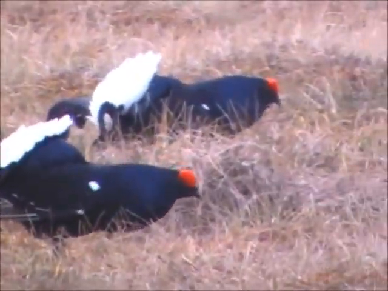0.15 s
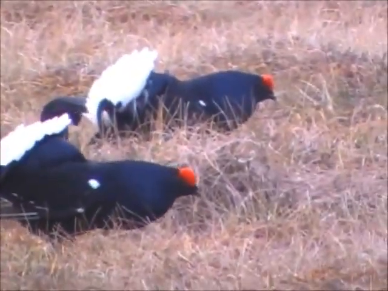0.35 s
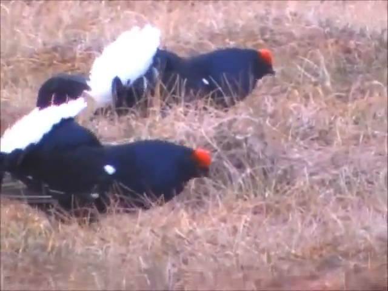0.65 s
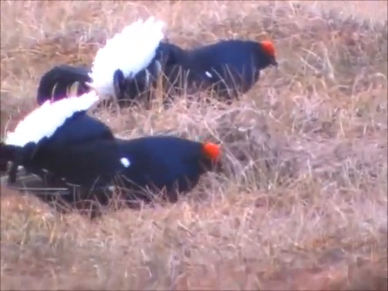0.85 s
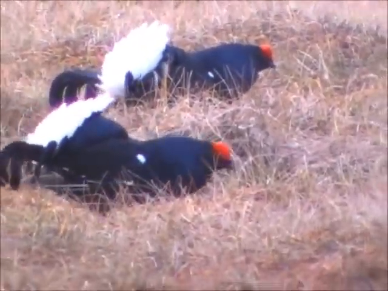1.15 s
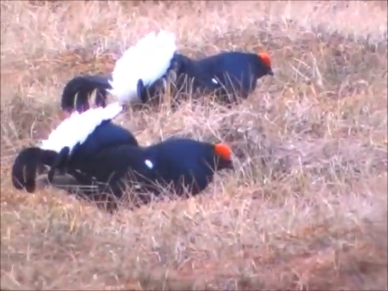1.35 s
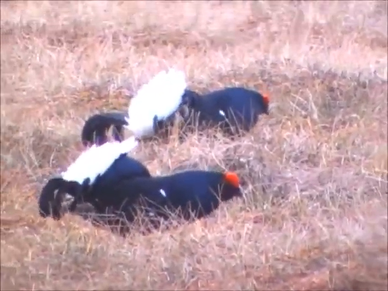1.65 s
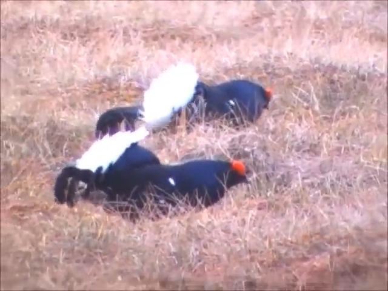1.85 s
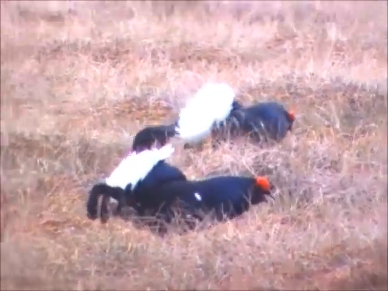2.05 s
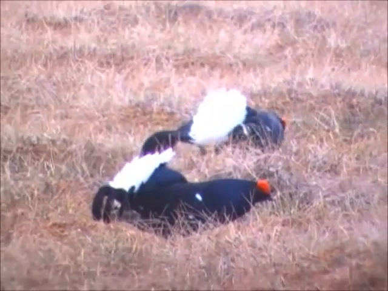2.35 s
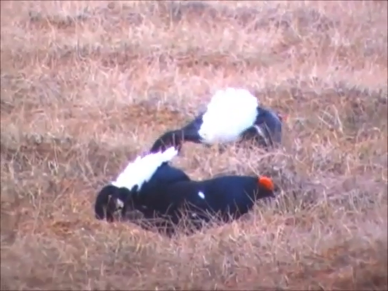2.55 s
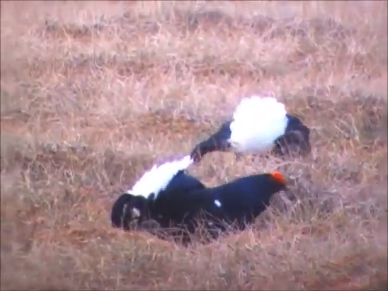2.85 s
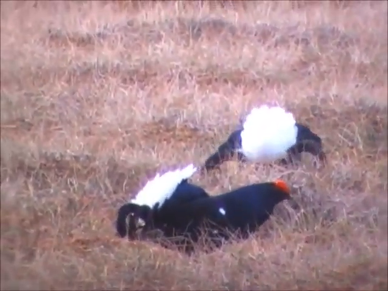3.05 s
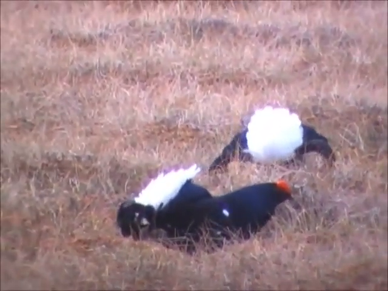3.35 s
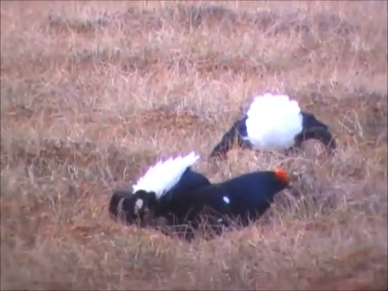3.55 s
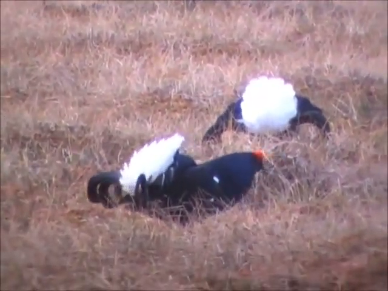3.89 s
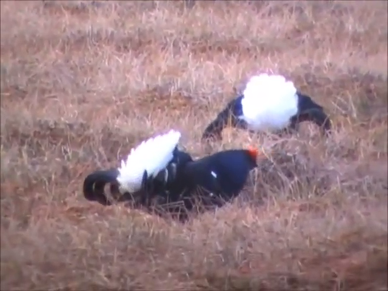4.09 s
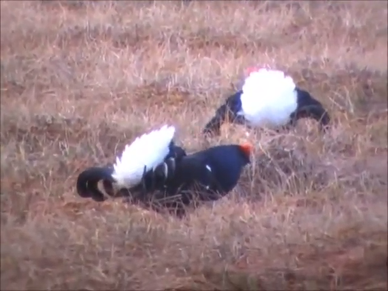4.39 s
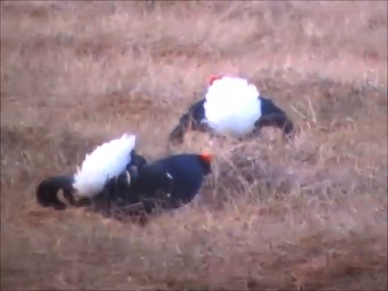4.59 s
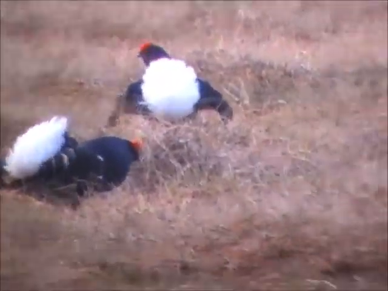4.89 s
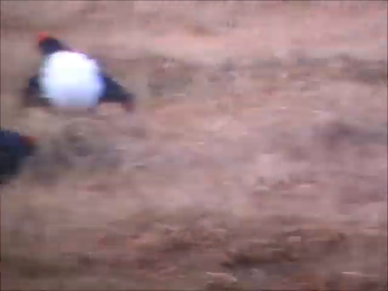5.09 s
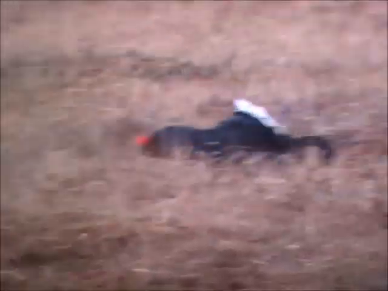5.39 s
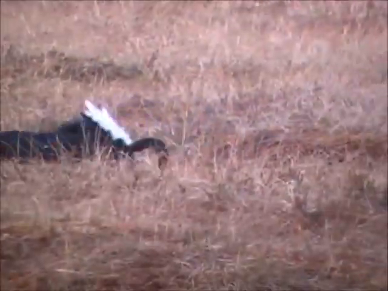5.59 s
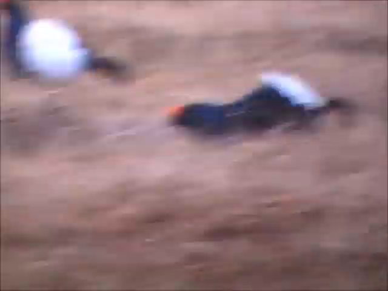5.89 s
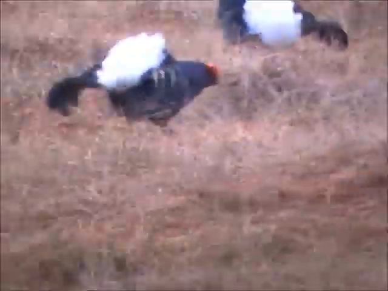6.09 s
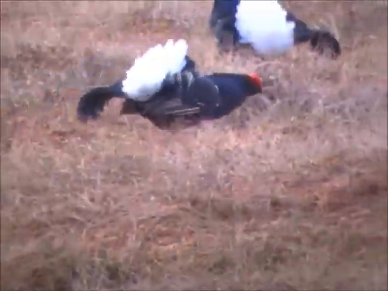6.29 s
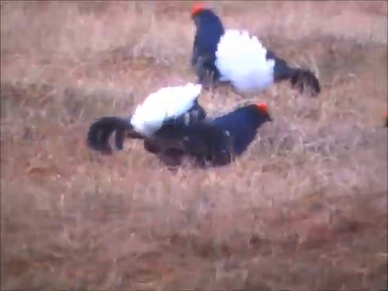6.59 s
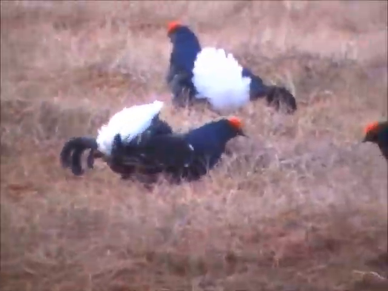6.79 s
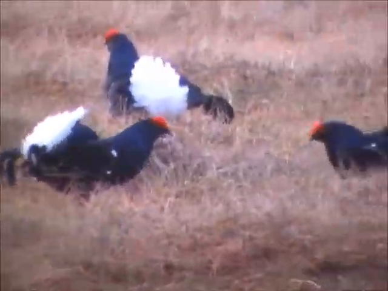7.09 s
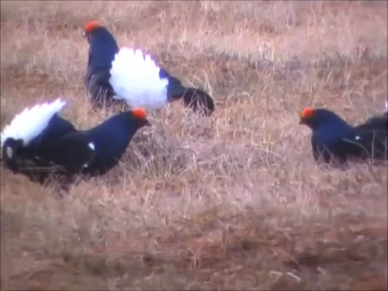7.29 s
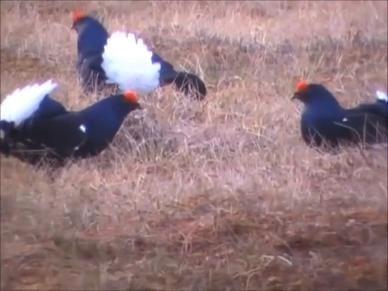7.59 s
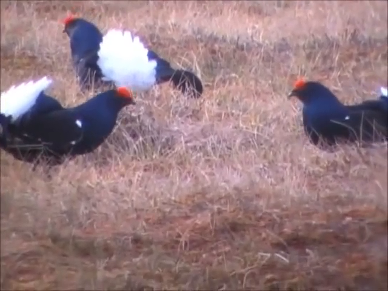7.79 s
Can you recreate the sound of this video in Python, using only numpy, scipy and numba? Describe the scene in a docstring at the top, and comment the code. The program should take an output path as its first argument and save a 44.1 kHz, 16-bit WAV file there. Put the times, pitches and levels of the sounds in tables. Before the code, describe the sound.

Several black grouse cocks bubble short low coos over a rolling distant chorus on an open bog. Softened hisses trail off at the start, then a pipit trills and buzzes. A long thin whistle and twitters follow, then one strong harsh hiss and a fast run of pipit phrases. Near the end come more buzzes, a piercing close call and a hard knock. The camera's microphone picks up its own faint whirr and ticks.

```python
"""Black grouse cocks display on an open bog, while a small camera whirrs, whines and ticks close by.
Far cocks blur into a chorus throughout, near ones bubble out short coos, and two of five hisses begin before the start.
A pipit trills and buzzes early; whistles and twitters follow, then the loudest hiss and a run of pipit phrases.
Late on come more buzzes, one loud call close by and a hard knock. Birds are gliding sine notes;
hisses are noise in moving resonances, ticks are ringing plastic, and air and wind are filtered noise."""
import sys
import numpy as np
from scipy import signal
from scipy.fft import next_fast_len
from scipy.io import wavfile
from numba import njit

SR = 44100
rng = np.random.default_rng(int(sys.argv[2]) if len(sys.argv) > 2 else 0)


def store_wav(level_fs):
    """Save 16-bit WAV to argv[1]."""
    pcm = np.round(np.clip(np.atleast_2d(level_fs), -1, 1) * 32767)
    wavfile.write(sys.argv[1], SR, pcm.T.astype(np.int16))


N = 350154


def amp(db):
    """Turn decibels into a plain gain."""
    return 10 ** (np.asarray(db, float) / 20)


def rms_one(x):
    """Scale a sound to an average power of 1."""
    return x / np.sqrt(np.mean(x ** 2) + 1e-20)


def pan(x, pan_db):
    """Make left and right copies, the left one pan_db louder."""
    return np.array([x * amp(pan_db / 2), x * amp(-pan_db / 2)])


def filtered(x, order, edges_hz, kind):
    """Keep one part of the spectrum: a smooth filter of the given kind."""
    return signal.sosfilt(signal.butter(order, edges_hz, kind, fs=SR, output="sos"), x)


def at_hz(points, hz):
    """Read a level from a spectrum table, with pitch on a logarithmic axis."""
    table_hz, values = np.array(points)[:, :2].T
    return np.interp(np.log(hz), np.log(table_hz), values)


def drift(rate):
    """Smooth random wandering around 0 with a spread of 1; a higher rate wanders faster."""
    step = 40   # samples between the random values
    r = np.exp(-2 * np.pi * step * rate / SR)
    noise = rng.standard_normal(N // step + 2002)
    slow = signal.lfilter([1], [1, -2 * r, r * r], noise)[2000:]   # skip the filter's start-up
    return np.interp(np.arange(N) / step, np.arange(len(slow)), rms_one(slow))


def span(rows):
    """Give the sample numbers from first to last row, and the other columns read along them."""
    s, *columns = np.transpose(rows)
    at = np.arange(max(round(s[0] * SR), 0), min(round(s[-1] * SR), N))
    return at, [np.interp(at / SR, s, column) for column in columns]


def add(out, rows, swing_hz=0., throb=1., edge_s=0.00033):
    """Add one gliding sine note with soft ends; rows hold seconds, Hz and peak dB."""
    at, (hz, db) = span(rows)
    k = np.arange(len(at))
    ends = np.clip(np.minimum(k, k[::-1]) / (edge_s * SR), 0, 1)
    cycles = np.cumsum(hz + np.resize(swing_hz, len(at))) / SR
    out[at] += amp(db) * throb * ends * np.sin(2 * np.pi * (cycles + rng.random()))


def flutter(rows, hz, swing_hz, from_share):
    """Swing the pitch of a note up and down, starting part way through it; the result is in Hz."""
    at = span(rows)[0]
    t = (at - at[0]) / SR
    depth = np.clip((t / t[-1] - from_share) * 6, 0, 1)
    return swing_hz * depth * np.sin(2 * np.pi * hz * t)


def ring(hits, hz, t60):
    """A unit hit sets off a sine that falls by 60 dB in t60 seconds."""
    r, w = amp(-60 / (t60 * SR)), 2 * np.pi * hz / SR
    return signal.lfilter([0, np.sin(w)], [1, -2 * r * np.cos(w), r * r], hits + 1e-18)


@njit
def resonate(x, two_cos, r):
    """A resonance whose centre can move sample by sample."""
    y = np.zeros(len(x))
    for i in range(2, len(x)):
        y[i] = x[i] - x[i - 2] + r * two_cos[i] * y[i - 1] - r * r * y[i - 2]
    return y


def sliding(hz, width_hz, count=1):
    """Noise passed count times through a resonance that follows hz, at an average power of 1."""
    x = rng.standard_normal(len(hz))
    two_cos, r = 2 * np.cos(2 * np.pi * hz / SR), np.exp(-np.pi * width_hz / SR)
    for _ in range(count):
        x = resonate(x, two_cos, r)
    return rms_one(x)


def stereo_noise(spectrum, patchy_db, more_alike):
    """Build noise from third-octave bands, each with its own level, flicker and left-right likeness."""
    # How alike left and right are; below 0 they push opposite ways, as in the bass.
    # Each row: pitch in Hz, likeness from -1 to 1 before more_alike is added.
    likeness = [(60, -0.53), (130, -0.42), (290, -0.42), (640, 0.025), (1410, 0.23), (3100, 0.78),
                (6820, 0.64), (15000, -0.82)]
    out, edges = 0, 40 * 2 ** (np.arange(0, 27) / 3)
    white = rng.standard_normal((2, 2, N))
    for k, (low, high) in enumerate(zip(edges, edges[1:])):
        mid, side = filtered(white[k % 2], 2, [low, high], "band")
        hz = np.sqrt(low * high)
        alike = np.clip(at_hz(likeness, hz) + more_alike, -.98, .98)
        gain = amp(at_hz(spectrum, hz) + patchy_db * drift(18.0))
        out = out + gain * (np.sqrt(1 + alike) * mid + np.sqrt(1 - alike) * side * [[1], [-1]])
    return rms_one(out)


def open_air():
    """Steady noise of open air and circuits, patchy from moment to moment."""
    # Colour of the noise. Each row: pitch in Hz, relative level in dB per Hz.
    air_spectrum = [(30, -6.5), (284, -5), (467, 4), (808, -4.5), (1080, -2), (1970, -2.5), (2300, -20.5),
                    (3070, -5.5), (5590, -10), (13300, -27), (15500, -58)]
    return amp(-55.5) * stereo_noise(air_spectrum, patchy_db=3.0, more_alike=-0.32)


def wind():
    """Gusts on the microphone: lumpy low noise that starts fast, fades and differs partly between left and right."""
    # Low rumbles. Each row: start in seconds, length in seconds, level in dB.
    gusts = [(2.362, 0.31, -63), (7.236, 0.13, -66.5)]
    t, level = np.arange(N) / SR, np.zeros(N)
    for s, length_s, db in gusts:
        level += amp(db) * np.interp(t, [s, s + 0.014, s + length_s], [0, 1, 0])
    mid, side = filtered(rng.standard_normal((2, N)), 2, [90, 280], "band")
    return level * amp(1.2 * drift(22.9)) * (rms_one(mid) + 0.69 * rms_one(side) * [[1], [-1]])


def camera():
    """The drive whirrs as noise in narrow bands, and a thin, high whine is a sine."""
    # Bands of the whirr. Each row: pitch in Hz, width in Hz, level in dB.
    whirr = [(1076, 9.7, -69.5), (1974, 110, -64), (3033, 230, -64)]
    whine_hz, whine_db = 15625, -93
    out = amp(whine_db + 3.2 * drift(3)) * np.sin(2 * np.pi * whine_hz * np.arange(N) / SR)
    for hz, width_hz, db in whirr:
        mid, side = [sliding(np.full(N, hz), width_hz) for _ in range(2)]
        out = out + amp(db) * (mid + 0.31 * side * [[1], [-1]])
    return out


def ticks():
    """Ticks ring the camera's plastic body, snap in the treble and thud in opposite directions left and right."""
    # Ticks of the body. Each row: time in seconds, level in dB,
    # thud in dB relative to the tick before a common boost.
    tick_rows = [(0.341, -48.5, -16), (0.502, -48.5, -27), (0.623, -52, -16), (0.752, -45, -31),
                 (1.087, -57, -28), (1.256, -52.5, -22), (1.407, -53.5, -18), (2.015, -44, -15),
                 (2.986, -51.5, -20), (4.542, -51.5, -9), (4.597, -50, -44), (6.004, -54, -17),
                 (6.663, -46.5, -15), (7.557, -50, -20), (7.579, -50, -20), (7.633, -54, -20),
                 (7.75, -57, -20), (7.805, -56, -25), (7.839, -52, -17), (7.928, -38, -28)]
    # One harder knock: time in seconds, level in dB, thud in dB as above.
    knock = (7.921, -30.5, -30)
    # Resonances of the plastic. Each row: pitch in Hz, gain in dB, time to fall 60 dB in seconds.
    plastic = [(757, 8.5, 0.02), (1010, 1, 0.021), (1390, 8, 0.0059)]
    knock_lead_s, snap_t60_s = .0003, 0.0089
    s, db, thud_db = np.transpose(list(tick_rows) + [knock])
    at = np.round(s * SR).astype(int)
    body, thud, snap = np.zeros((2, N)), np.zeros(N), np.zeros((2, N))
    body[:, at] = pan(amp(db), -8)
    thud[at] = amp(db + thud_db + 17.0)
    snap[:, at] = amp(db + 4)
    # the ringing of the knock is equal on both sides but reaches the left first
    body[:, at[-1]] = 0, amp(db[-1])
    body[0, at[-1] - round(knock_lead_s * SR)] = amp(db[-1])

    soft = signal.lfilter([.25], [1, -.75], body)
    rung = sum(amp(level_db) * ring(soft, hz, t60) for hz, level_db, t60 in plastic)
    rung = filtered(rung, 2, 350, "high")
    decay = signal.lfilter([1], [1, -amp(-60 / (snap_t60_s * SR))], snap + 1e-18)
    crack = filtered(rng.standard_normal(N), 3, [1500, 7700], "band")
    push = ring(signal.lfilter([.05], [1, -.95], thud), hz=184, t60=0.033)
    return rung + decay * crack + push * [[1.3], [-.5]]


def clicks():
    """Dry clicks: short dying bursts of noise, each in a band around its own pitch."""
    # Each row: time in seconds, peak level in dB, pitch in Hz.
    click_rows = [(.752, -33, 4500), (1.085, -43, 1550), (2.308, -42, 1600), (2.388, -46, 1750),
                  (6.37, -53, 12500), (6.561, -28, 5300)]
    width, cycles = .24, 70   # band half-width as a share of the pitch; cycles to fall 60 dB
    out, t = np.zeros(N), np.arange(SR // 20) / SR
    for s, db, hz in click_rows:
        noise = rng.standard_normal(len(t)) * amp(-60 * t * hz / cycles)
        burst = filtered(noise, 2, [hz * (1 - width), hz * (1 + width)], "band")
        out[round(s * SR):][:len(t)] += amp(db) * burst / np.abs(burst).max()
    return out


def outdoors(x):
    """Return sound from ground, hummocks, scrub and trees: faint echoes and a diffuse tail, unlike left and right."""
    # Ground and hummocks. Each row: middle delay in seconds (left a little less, right more), level in dB.
    echoes = [(0.01, -13.5), (0.028, -28.5)]
    trees_t60_s, trees_db = 0.71, -12.5
    t = np.arange(SR // 2) / SR
    tail = rng.standard_normal((2, len(t))) * amp(-60 * t / trees_t60_s) * (t > .01)
    tail *= amp(trees_db) / np.sqrt(np.sum(tail[0] ** 2))
    for lag_s, db in echoes:
        tail[[0, 1], [round(lag_s * .93 * SR), round(lag_s * 1.08 * SR)]] += amp(db)
    return signal.fftconvolve(x[None], tail, axes=1)[:, :N]


def far_chorus():
    """Two far cocks keep up a rolling beat of coos; the lower is more even and falls, the higher also rises."""
    # Each row: time in seconds, level of the lower cock in dB, level of the higher cock in dB, before mixing.
    chorus_levels = [(0, -63, -57.5), (.72, -60, -62), (0.802, -81, -72), (.95, -64.5, -65.5),
                     (1.9, -61, -58), (2.151, -80, -59), (2.25, -67, -67.5), (3.55, -73, -62),
                     (3.65, -65.5, -72), (4.3, -60.5, -68.5), (4.6, -61.5, -61), (5.9, -63, -57),
                     (6.5, -70, -59.5), (6.7, -72, -67.5), (7.94, -88, -87)]
    # Pitch of the lower cock. Each row: time in seconds, pitch in Hz.
    low_pitch = [(0, 422), (1, 397), (3.6, 398), (4.25, 400), (4.8, 448), (7.94, 430.6)]
    # Range of the pitch slides of the lower and the higher cock, in Hz from the middle to the end of a coo.
    slide_ranges = (14, 64), (-45, 70)
    coos_per_s, high_pitch = 13, [(0, 508)]
    s, *levels_db = np.transpose(chorus_levels)
    cocks = []
    for level_db, uneven, slides_hz, pitches in zip(levels_db, (.25, .9), slide_ranges, (low_pitch, high_pitch)):
        gap, size, length, pitch, fall = rng.random((130, 5)).T
        at = np.cumsum(1 + uneven * (gap - .5)) / coos_per_s
        hz = np.interp(at, *np.transpose(pitches)) + 60 * uneven * (pitch - .5)
        rows = np.c_[at, 7 * size, 24 + 20 * length, hz, np.interp(fall, (0, 1), slides_hz)]
        coos = rms_one(coo_train(rows[at < N / SR], 0.79))
        cocks.append(amp(np.interp(np.arange(N) / SR, s, level_db)) * coos)
    lower, higher = cocks
    return np.array([lower + 1.52 * higher, higher + 0.68 * lower])


def pipit_trills(out):
    """A pipit repeats quick falling strokes that slowly spread apart."""
    # Each row: start in seconds, number of strokes, first gap in seconds (it grows), level in dB.
    trills = [(0.1491, 14, .0843, -55.5), (5.7503, 2, .0803, -54.5)]
    # One falling stroke. Each row: time in seconds, pitch in Hz, relative level in dB.
    stroke = [(0, 5870, -27), (.006, 5620, 8), (.014, 4840, 3), (.021, 4150, -6), (.03, 3450, 2.5),
              (0.041, 2850, -19)]
    swell_db = .25   # rise per stroke through the first half
    slowing_s = .00007   # extra delay, times the stroke number squared
    for s, count, gap_s, db in trills:
        for k in range(round(count)):
            start = s - .003 + k * gap_s + k * k * slowing_s
            level_db = db + swell_db * min(k - count / 2, 0) + rng.normal(0, 1)
            add(out, np.array(stroke) * [1, rng.normal(1, 0.0093), 1] + [start, 0, level_db])


def pipit_phrases(out):
    """A pipit repeats one phrase of quick gliding notes, each time slightly varied."""
    # Each row: start in seconds, level in dB.
    phrases = [(4.492, -51.5), (4.661, -47.5), (4.816, -45), (4.97, -41.5), (5.125, -43), (5.279, -40),
               (5.436, -41), (5.591, -43)]
    # Three rising strokes, a peaked note and a low flick.
    # Each row of a note: time in seconds, pitch in Hz, relative level in dB.
    phrase_notes = [
        [(0, 5220, -8), (.006, 5850, -15), (.011, 6370, -8)],
        [(.007, 5080, -15), (.016, 6010, -2), (.025, 6600, -10)],
        [(.021, 5200, -7), (.031, 6050, -1), (.045, 6750, -6)],
        [(.046, 3600, -31), (.058, 4285, -5.5), (.064, 5800, -5), (.072, 4720, -2), (.084, 3270, -16)],
        [(.09, 3420, -2), (.098, 3150, -8), (.112, 2600, -16)],
    ]
    for s, db in phrases:
        for note in phrase_notes:
            varied = np.array(note) * [1, rng.normal(1, 0.0089), 1]
            add(out, varied + [s, 0, db + rng.normal(0, 1.06)], edge_s=0.0004)


def pipit_buzzes(out):
    """A pipit buzzes: an upward flick, then a falling note that flutters fast in level and pitch."""
    # Each row: start in seconds, length in seconds, pitch factor, level in dB.
    buzzes = [(1.376, 0.187, 1.001, -50.5), (1.81, 0.265, .995, -48), (5.95, 0.21, 1.02, -47),
              (6.416, 0.22, 1.02, -44.5), (6.923, 0.24, 1.012, -46.5)]
    # Course of a buzz. Each row: share of its length, pitch in Hz before the factor, relative level in dB.
    buzz_course = [(0, 6520, -11), (.08, 6370, -3), (0.198, 6340, 0.5), (0.398, 6090, 0.5), (.6, 5630, 0),
                   (.8, 5410, 1), (.92, 5370, 0), (1, 5350, -8.5)]
    # Flick into the buzz. Each row: time in seconds, pitch in Hz, relative level in dB.
    lead_flick = [(-.013, 4050, -13.5), (-.006, 5280, -3), (.001, 6800, -3)]
    flutter_hz, level_depth, swing_hz = 147, 0.37, 208   # the rate wanders around flutter_hz
    for s, length_s, pitch, db in buzzes:
        rows = np.array(buzz_course) * [length_s, pitch, 1] + [s, 0, db]
        at = span(rows)[0]
        cycles = np.cumsum(flutter_hz * amp(1.9 * drift(56)[at])) / SR
        beat = 2 * np.pi * (cycles + rng.random())
        swing = swing_hz * np.linspace(1, .6, len(at)) * np.sin(beat)
        add(out, rows, swing, 1 + level_depth * np.sin(beat + 2.0))
        add(out, np.array(lead_flick) + [s, 0, db])


def long_whistles(out):
    """A long whistle drops quickly in pitch, then sags slowly as it swells."""
    # Each row: start in seconds, length in seconds, level in dB.
    whistles = [(2.45, .645, -43), (7.565, .6, -41)]
    # Swell of a whistle. Each row: share of its length, relative level in dB.
    whistle_swell = [(0, -23), (.14, -15), (.4, -9.5), (.7, 1.5), (.96, -9), (1, -9)]
    base_hz, drop_hz, settle_s, sag_hz_per_s = 6920, 1053, .1, 1100
    for s, length_s, db in whistles:
        t = np.linspace(0, length_s, 60)
        hz = base_hz + drop_hz * np.clip(1 - t / settle_s, 0, 1) ** 1.4 - sag_hz_per_s * t
        level_db = db + np.interp(t / length_s, *np.transpose(whistle_swell))
        add(out, np.c_[s + t, hz, level_db], edge_s=0.00067)


def twitters(out):
    """Each twitter is three upward flicks of growing strength, a warble and a slide down."""
    # Each row: start in seconds, level in dB.
    twitter_rows = [(2.571, -52), (2.853, -50), (3.125, -51.5), (3.399, -49)]
    # The three parts. Each row: time in seconds, pitch in Hz, relative level in dB.
    flick = [(0, 3380, -8), (.007, 4170, -1.5), (.013, 4700, -0.5), (.018, 3870, -14)]
    warble = [(.064, 5500, -5), (.075, 5650, -5), (.122, 5650, -6)]
    slide = [(.122, 5220, -14), (.132, 4750, -4), (.15, 4280, -4)]
    flick_gap_s = 0.023
    for s, db in twitter_rows:
        for k in range(3):
            add(out, np.array(flick) + [s + k * flick_gap_s, 0, db + 2.5 * (k - 2)])
        rows = np.array(warble) + [s, 0, db]
        uneven = amp(3.7 * drift(40)[span(rows)[0]] - 2)
        add(out, rows, flutter(rows, hz=55, swing_hz=290, from_share=0), uneven)
        add(out, np.array(slide) + [s, 0, db])


def short_notes(out):
    """Other small birds give arched notes, rising notes that end in a flutter, and brief chirps."""
    # Arched and rising notes. Each row: start in seconds, level in dB.
    arches = [(1.631, -55.5), (6.231, -52.5), (6.73, -54)]
    risers = [(6.711, -55), (6.927, -56.5), (7.146, -57)]
    # Shapes of one arch and one rise. Each row: time in seconds, pitch in Hz, relative level in dB.
    arch = [(0, 3110, -0.5), (.04, 3560, 3), (.056, 3600, 5), (.085, 3080, -2)]
    riser = [(0, 2975, 1), (.03, 3330, 1.5), (.062, 4250, 3.5), (.135, 4550, -3)]
    # Each row: start in seconds, length in ms, start, middle and end pitch in Hz, level in dB.
    chirps = [(1.78, 8, 4300, 5050, 5500, -54), (2.75, 40, 1380, 1440, 1510, -48),
              (2.795, 28, 1740, 1830, 1900, -51), (2.256, 43, 6200, 5300, 4730, -57),
              (2.352, 34, 4100, 3500, 3100, -56), (2.463, 37, 6530, 5400, 4750, -51),
              (2.51, 38, 1630, 1695, 1730, -55), (2.553, 20, 2500, 2450, 2400, -55),
              (2.825, 22, 2720, 2720, 2690, -56), (3, 18, 3880, 3400, 3030, -55),
              (3.104, 20, 2670, 2570, 2500, -50), (3.15, 19, 3910, 3500, 3100, -53),
              (3.307, 20, 3900, 3450, 3020, -54), (3.458, 20, 3900, 3500, 3100, -57),
              (4.49, 117, 3580, 3770, 3770, -55), (4.52, 105, 2500, 2620, 2580, -55.5),
              (4.627, 20, 4630, 4000, 3500, -52.5), (4.648, 39, 3120, 3050, 2710, -47),
              (4.7, 43.4, 2320, 2130, 1970, -47.5), (5.042, 11, 3100, 3500, 3000, -49),
              (5.078, 13, 3900, 3300, 3120, -46.5), (5.09, 19, 3060, 3800, 3140, -48),
              (7.383, 29, 2430, 3050, 3280, -53), (7.41, 76, 3300, 3280, 3100, -50),
              (7.5, 28, 4750, 4600, 3940, -56), (7.74, 64, 6000, 5100, 4150, -55),
              (7.861, 42, 2870, 4040, 4250, -48)]
    for s, db in arches:
        add(out, np.array(arch) + [s, 0, db])
    for s, db in risers:
        rows = np.array(riser) + [s, 0, db]
        add(out, rows, flutter(rows, hz=82.3, swing_hz=210, from_share=.5))
    for s, ms, start_hz, middle_hz, end_hz, db in chirps:
        u = np.linspace(-1, 1, 9)   # from start to end of the chirp
        hz = middle_hz + (end_hz - start_hz) / 2 * u + ((start_hz + end_hz) / 2 - middle_hz) * u ** 2
        add(out, np.c_[s + ms / 2000 * (u + 1), hz, db - 6 * u ** 2])


def small_birds():
    """All the smaller songs are near sines, together flickering a little in level."""
    out = np.zeros(N)
    for song in (pipit_trills, pipit_phrases, pipit_buzzes, long_whistles, twitters, short_notes):
        song(out)
    return out * amp(1.33 * drift(60))


def near_bird():
    """A bird close by gives one loud arched call with a faint octave and two quick echoes."""
    # Each row: time in seconds, pitch in Hz, level in dB.
    near_call = np.array([(7.132, 6100, -48), (7.14, 6700, -27.5), (7.15, 7070, -23), (7.176, 7310, -19.5),
                          (7.19, 7406, -21), (7.215, 7460, -16.5), (7.232, 7380, -17.5),
                          (7.242, 7160, -18.5), (7.249, 7100, -41)])
    out = np.zeros(N)
    add(out, near_call, edge_s=0.0011)
    add(out, near_call * [1, 2, 1] + [0, 0, -49])
    for lag_s, echo_db in ((.013, -23), (.03, -37)):
        add(out, near_call + [lag_s, 0, echo_db])
    return out


def hiss_course(start, blast_s, turn, end, start_hz, turn_hz, end_hz, last_hz,
                first_db, turn_db, second_db, bright_db, tail_s):
    """Shape one hiss: attack, peak, sag, turn, swell, hold and a dull dying away."""
    s = np.array([start, start + .02, start + .045, start + blast_s, turn, turn + .07,
                  (turn + end) / 2, end, end + .05, end + tail_s])
    # the throat pitch falls fastest at first, then rises or falls on from the turn
    left = np.clip((turn - s) / (turn - start), 0, 1) ** (1 / .66)
    after_turn = np.interp(s, [turn, end, end + tail_s], [turn_hz, end_hz, last_hz])
    hz = (start_hz - turn_hz) * left + after_turn
    db = [first_db - 17, first_db - 3.5, first_db, first_db - 2.5, turn_db,
          second_db - 0.5, second_db, second_db, second_db - 7.5, second_db - 11.5]
    dull_db = np.array([-8.5, -8.5, -8.5, -11, -5, -5, 0, -5, -10.5, -42])
    return np.c_[s, hz, db, bright_db + dull_db]   # seconds, throat Hz, throat dB, brightness dB


def hisses():
    """Air forced through the throat: noise in sliding throat and mouth resonances plus a bright spray."""
    # Two-part hisses. Each row: start in seconds, length of the first blast in seconds, turn and end in seconds,
    # throat pitch in Hz at start, turn, end and last, level in dB of first blast, turn and second blast,
    # brightness over the throat in dB before a common boost, dying away in seconds, starting share of broad rasp.
    hiss_rows = [(-.9, .3, -.5, .1, 1700, 1300, 1880, 2400, -45, -55, -47, -7, .2, .8),
                 (-.4, .2, -.1, .6, 1700, 1580, 1630, 1600, -48, -55, -49, -14, .6, .55),
                 (2.645, .08, 2.96, 3.36, 1700, 1340, 1620, 1750, -47.5, -59, -50.5, -16, .2, .7),
                 (3.6, .18, 3.85, 4.38, 1680, 1170, 1740, 1950, -32.5, -47.5, -39.5, -12, .14, .3),
                 (6.112, .075, 6.3, 6.86, 1800, 1220, 1790, 1850, -47.5, -56, -51.5, -13, .2, 1.1)]
    # Upper resonances for a throat at 1500 Hz. Each row: pitch in Hz, width in Hz, relative level in dB.
    mouth_rows = [(2700, 410, -12), (4780, 530, 1), (6600, 680, -0.5)]
    # Colour of the spray. Each row: pitch in Hz, relative level in dB per Hz.
    spray_spectrum = [(1500, -30), (2000, -11.5), (2800, -3), (4800, 2), (6500, -4.5), (7800, -15),
                      (9500, -35), (12000, -55)]
    rasp_per_khz, tail_rasp = 2.1, 12   # broad rasp added as the throat rises, and above 1800 Hz
    throat, mouth, spray_gain, sizzle_gain = np.zeros((4, N))
    for *row, base_rasp in hiss_rows:
        at, (hz, db, bright_db) = span(hiss_course(*row))
        fade = np.clip((at[-1] - at) / (.06 * SR), 0, 1)
        rasp = base_rasp + rasp_per_khz * (hz - hz.min()) / 1000 + tail_rasp * np.clip(hz / 1800 - 1, 0, 1)
        core = sliding(hz, 90, count=2)   # hoarse, nearly tonal
        broad = sliding(hz * 1.05, 620, count=2)
        throat[at] += fade * amp(db) * (core + rasp * broad) / np.sqrt(1 + rasp ** 2)
        sizzle_gain[at] += fade * amp(-68 + 1.6 * (db + 34.5))   # grows faster than the throat
        bright = fade * amp(db + bright_db + 7.5)
        spray_gain[at] += bright
        for mouth_hz, width_hz, level_db in mouth_rows:
            follow = (hz / 1500) ** .3   # the mouth follows the throat only partly
            mouth[at] += bright * amp(level_db) * sliding(mouth_hz * follow, width_hz)
    throat = filtered(throat + 1e-18, 6, [1130, 6500], "band")
    mouth = filtered(mouth + 1e-18, 3, [2100, 10000], "band")
    spray = filtered(stereo_noise(spray_spectrum, patchy_db=1.8, more_alike=.1), 3, 13000, "low")
    sizzle = filtered(rng.standard_normal(N), 3, [9800, 13800], "band")
    torn = amp(1.5 * drift(53))   # fast flicker
    return throat * torn + mouth + sizzle_gain * rms_one(sizzle), spray_gain * spray


def coo_train(rows, stretch):
    """Each coo is a puff of the air sac: a near sine that swells, dies and slides in pitch."""
    out, u = np.zeros(N), np.linspace(-1, 1, 9)   # u runs from start to end of a coo
    for s, db, ms, hz, fall_hz in rows:
        arch_hz = 1.5 * ms * (.2 - u ** 2)   # longer coos rise before they fall
        add(out, np.c_[s + stretch * ms / 1000 * u, hz - fall_hz * u + arch_hz, db - 18 * np.abs(u) ** 3],
            edge_s=.002)
    return out


def near_coos():
    """The near cocks bubble out short coos one by one."""
    # Each row: middle in seconds, peak level in dB, length in ms (from start to end a coo takes 1.5 times this),
    # pitch in Hz and fall from middle to end in Hz, both before the arch of the pitch.
    coo_rows = [(0.145, -46.0, 22.0, 564.0, -60.0), (0.17, -45.0, 27.0, 544.0, 82.0),
                (0.245, -47, 35, 520, 40), (0.326, -47, 24, 495, 50), (0.527, -46.0, 31.0, 495.0, 48.0),
                (0.591, -48.0, 53.0, 524.0, 13.0), (0.668, -47.0, 50.0, 526.0, 72.0),
                (0.992, -50.0, 53.0, 527.0, -24.0), (1.032, -42.0, 16.0, 499.0, 36.0),
                (1.14, -44.0, 26.0, 516.0, 41.0), (1.245, -49, 30, 520, -45), (1.285, -46, 26, 510, 45),
                (1.448, -46.0, 23.0, 500.0, 7.0), (1.5, -50, 50, 540, 0), (1.55, -46, 26, 480, 45),
                (1.676, -42.0, 10.0, 499.0, 46.0), (1.701, -44.0, 17.0, 520.0, -18.0),
                (1.722, -44.0, 17.0, 519.0, 43.0), (1.758, -42.0, 9.0, 492.0, -26.0),
                (1.862, -43.0, 16.0, 528.0, 21.0), (1.946, -43, 40, 575, -10),
                (1.985, -42.0, 17.0, 518.0, 8.0), (2.078, -43.0, 23.0, 515.0, 49.0),
                (2.133, -43.0, 18.0, 481.0, 38.0), (2.331, -45.0, 18.0, 535.0, 63.0),
                (2.48, -43.0, 26.0, 500.0, 38.0), (2.58, -42.0, 21.0, 525.0, 69.0),
                (2.717, -45.0, 62.0, 506.0, 5.0), (2.778, -45.0, 15.0, 457.0, -67.0),
                (2.815, -43.0, 21.0, 473.0, 17.0), (2.862, -43.0, 13.0, 482.0, -78.0),
                (2.891, -45.0, 15.0, 511.0, 90.0), (3.012, -41.0, 22.0, 483.0, 65.0),
                (3.131, -42.0, 17.0, 493.0, 10.0), (3.156, -40.0, 15.0, 502.0, -24.0),
                (3.18, -41.0, 20.0, 507.0, 52.0), (3.216, -43.0, 12.0, 503.0, -21.0),
                (3.256, -44.0, 16.0, 486.0, 24.0), (3.318, -38.0, 17.0, 526.0, 38.0),
                (3.395, -40.0, 20.0, 556.0, -93.0), (3.433, -41.0, 36.0, 526.0, 80.0),
                (3.481, -43.0, 15.0, 497.0, -51.0), (3.507, -44.0, 15.0, 503.0, 42.0),
                (3.584, -43.0, 30.0, 499.0, 63.0), (3.809, -43.0, 22.0, 516.0, 70.0),
                (4.445, -49.0, 54.0, 465.0, 59.0), (4.515, -49.0, 61.0, 513.0, 18.0),
                (4.869, -49.0, 39.0, 489.0, 44.0), (4.939, -46.0, 30.0, 532.0, 8.0),
                (5.041, -47.0, 56.0, 524.0, 4.0), (5.39, -45.0, 29.0, 510.0, -17.0),
                (5.449, -46.0, 40.0, 510.0, -3.0), (5.485, -46.0, 24.0, 492.0, 38.0),
                (5.548, -45.0, 17.0, 521.0, 47.0), (5.643, -45.0, 41.0, 508.0, -49.0),
                (5.731, -47.0, 28.0, 494.0, 45.0), (5.776, -45.0, 43.0, 516.0, -7.0),
                (5.865, -43.0, 17.0, 529.0, -31.0), (5.897, -41.0, 34.0, 543.0, 53.0),
                (5.974, -43.0, 29.0, 489.0, 6.0), (6.058, -41.0, 28.0, 486.0, 59.0),
                (6.131, -45.0, 21.0, 525.0, 55.0), (6.274, -42.0, 14.0, 557.0, 16.0),
                (6.366, -44.0, 58.0, 559.0, 6.0), (6.531, -45.0, 21.0, 508.0, 56.0)]
    return coo_train(coo_rows, 0.75)


def scene():
    """Put all sources in their places between left and right."""
    coos, birds, (throat, spray) = near_coos(), small_birds(), hisses()
    voices = pan(coos, 0.5) + pan(birds, -3.5) + pan(throat, -1.1)
    voices = voices + outdoors(coos + birds + throat)
    background = open_air() + wind() + camera() + ticks() + clicks()
    return background + far_chorus() + pan(near_bird(), -3) + voices + spray


def record(dry):
    """The microphone's two sides differ in phase, it drops the deep bass and the top is cut steeply."""
    lead_rad = 0.33   # the right side leads
    turn = np.exp([[-.5j * lead_rad], [.5j * lead_rad]])
    turned = np.real(signal.hilbert(dry, next_fast_len(N))[:, :N] * turn)
    thin = filtered(turned, 2, 108, "high")
    return signal.sosfilt(signal.ellip(12, .5, 60, 15714, fs=SR, output="sos"), thin)


dry = scene()
out = record(dry)
store_wav(out)
```